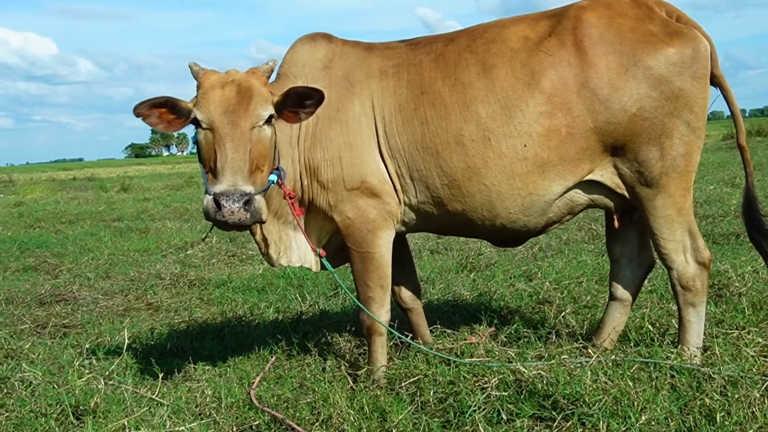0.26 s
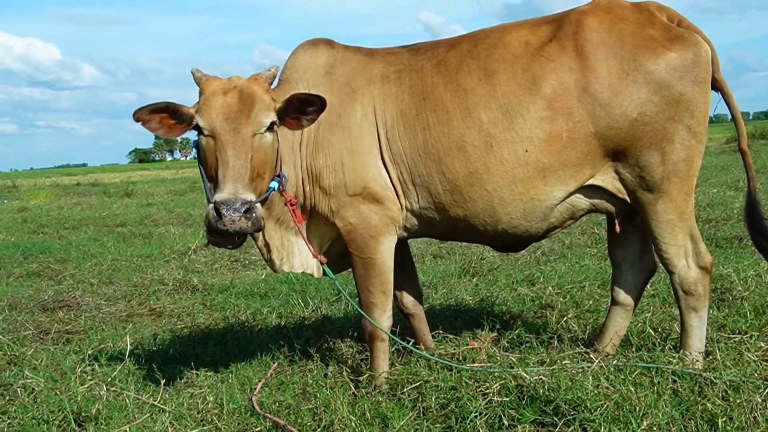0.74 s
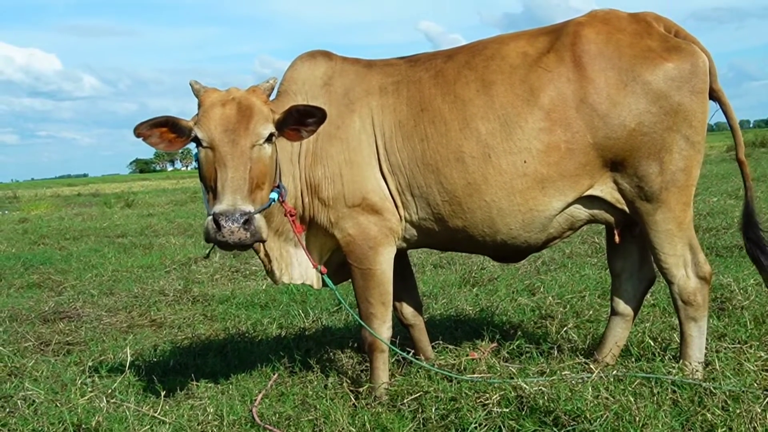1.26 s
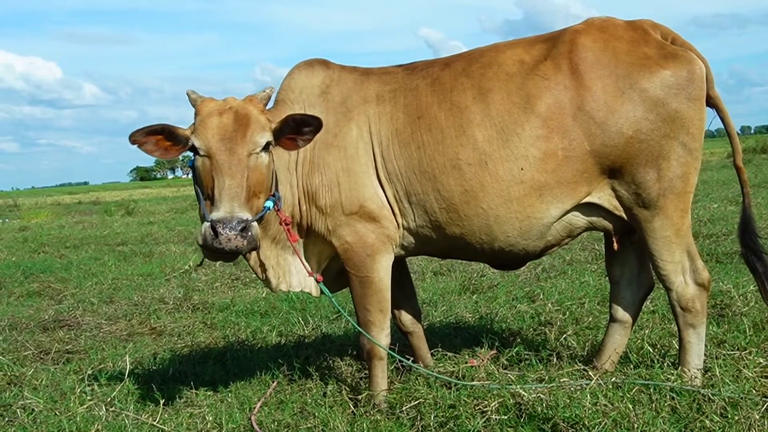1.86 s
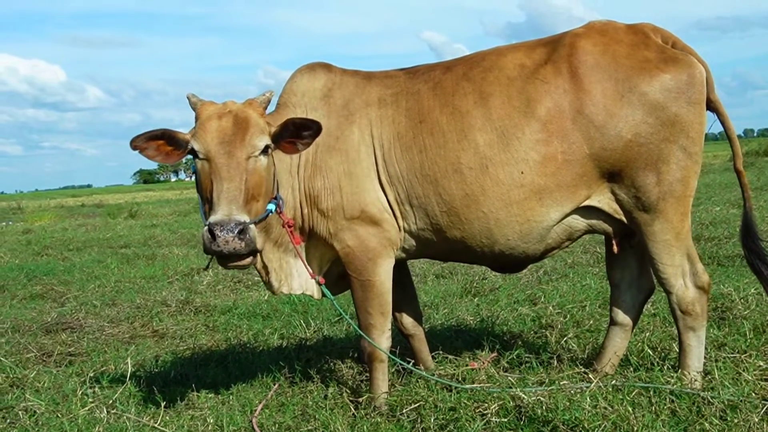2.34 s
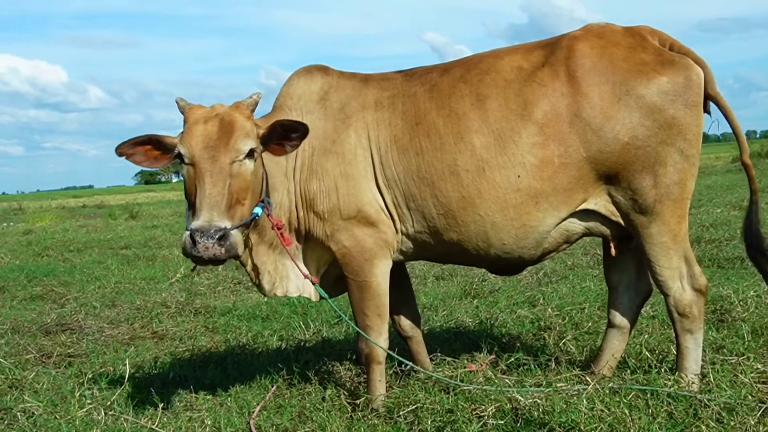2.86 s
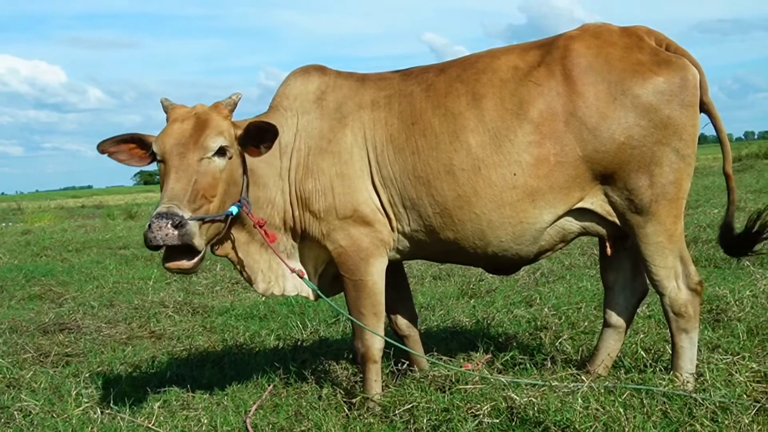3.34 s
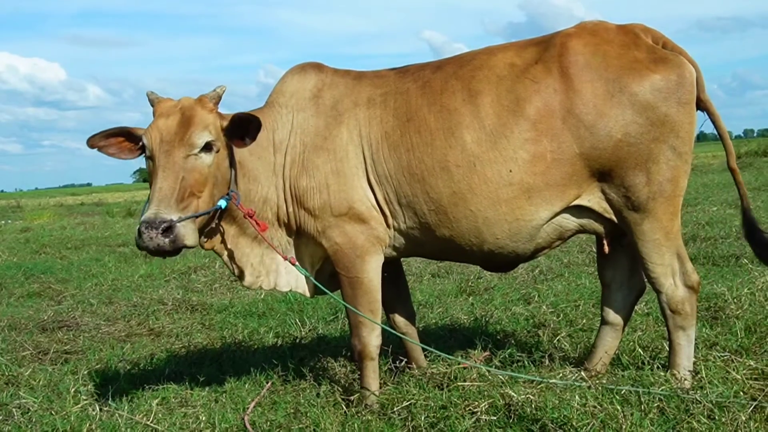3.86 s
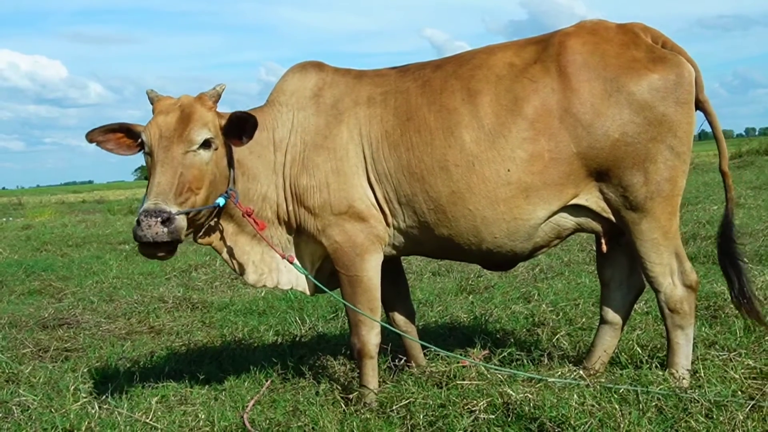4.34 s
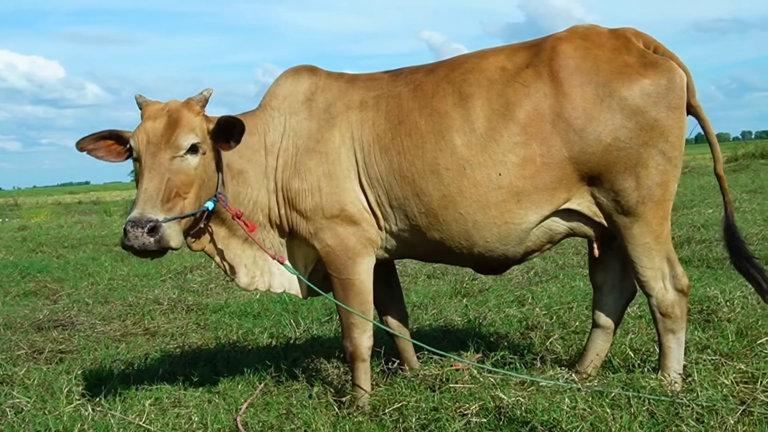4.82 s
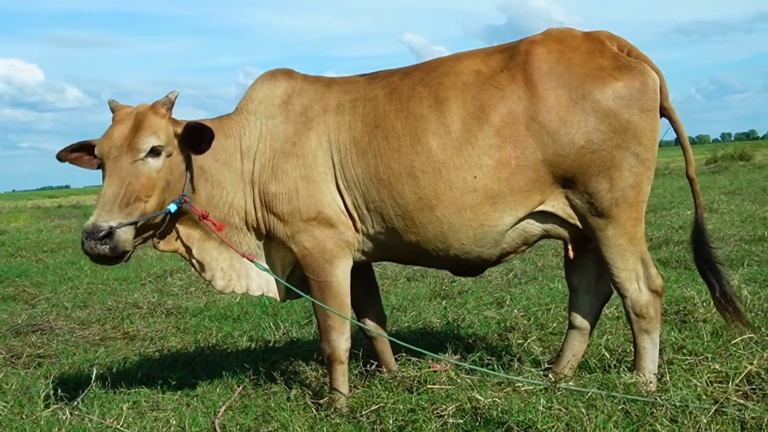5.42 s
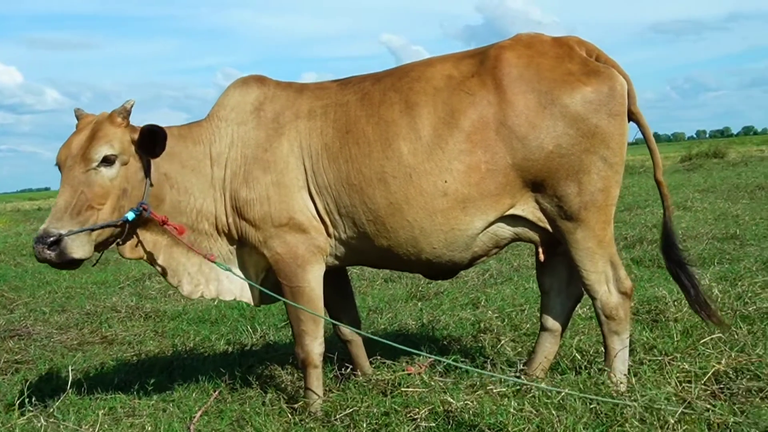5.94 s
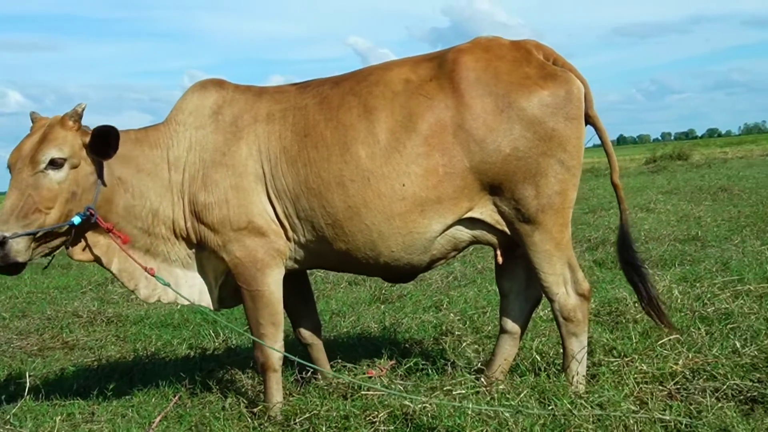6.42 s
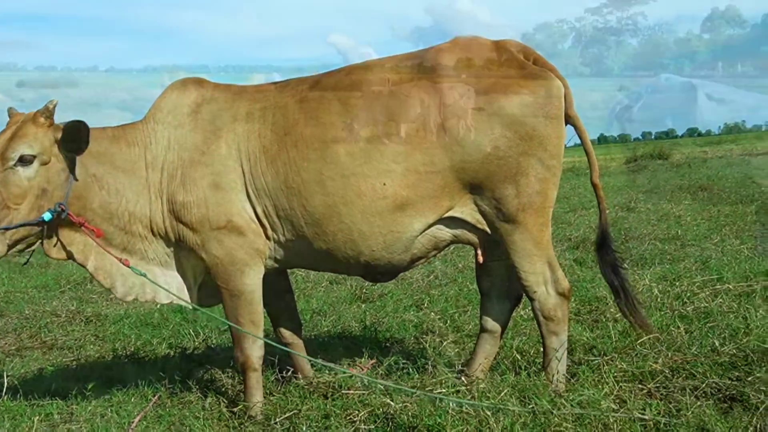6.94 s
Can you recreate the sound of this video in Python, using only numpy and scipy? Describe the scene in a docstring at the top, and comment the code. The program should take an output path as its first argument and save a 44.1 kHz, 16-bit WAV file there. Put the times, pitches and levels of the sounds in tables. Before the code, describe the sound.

A calm open pasture, heard in stereo for about seven seconds: steady low rumble, faint air and soft rustling grass, slightly stronger near 2.1 and 4.5 s. Small birds nearby, mostly left, warble in quick bending whistles around 0.5, 1.4, 1.8, 2.6 and 4.1 s, with a longer falling note at 4.4. Rapid trills recur, clearest at 2.3, over faint distant chirps. Soft blurred far calls hold near 3.7, 4.5 and 5.1. Dry grass snaps tick at 0.2, 1.0, 1.7, 2.8, 3.2, 4.1 and 5.0, the sharpest at 5.9. At 5.4 a close cow gives one low closed-mouth moo, unsteady at first, full until about 5.9, then sinking into a rough creak and gone by 6.2; an airy puff peaks at 5.5. Dense warbling accompanies the moo, returns around 6.3 to 6.7, and ends with bright chirps near 7.1.

```python
"""In an open field, a cow close by gives one short low moo with a puff of breath.
Small birds warble and trill as gliding tones, and far calls are held tones blurred with noise.
Grass snaps as short bursts of ringing and rustles as patchy noise, over air noise and a low rumble.
The moo is a train of vocal pulses, mixed with breath noise, that rings the throat."""
import sys
import numpy as np
from scipy import signal
from scipy.io import wavfile
from scipy.ndimage import uniform_filter1d

SR = 44100
rng = np.random.default_rng(int(sys.argv[2]) if len(sys.argv) > 2 else 0)


def store_pcm(level_fs):
    """Save levels as 16-bit WAV."""
    pcm = np.round(np.clip(level_fs, -1, 1) * 32767).astype(np.int16)
    wavfile.write(sys.argv[1], SR, np.atleast_2d(pcm).T)


N = 316621  # length of the scene [samples]


def gain_of(db):
    """Turns decibels into a plain multiplier."""
    return 10 ** (np.asarray(db) / 20)


def evened(x):
    """Scales a sound to an average strength (rms) of 1."""
    return x / np.sqrt(np.mean(x ** 2) + 1e-20)


def read(points, hz):
    """Reads a value at each pitch, along a logarithmic pitch axis."""
    point_hz, value = np.transpose(points)
    return np.interp(np.log(hz + 1), np.log(point_hz + 1), value)


def level(rows):
    """Joins (time [s], level [dB]) points into a gain curve over the whole scene."""
    s, db = np.transpose(rows)
    return gain_of(np.interp(np.arange(N) / SR, s, db))


def add(mix, s, sound, pan_db=0):
    """Lays a sound into both channels at time s; a positive pan_db leans to the left."""
    part = mix[:, round(max(s, 0) * SR):][:, :sound.shape[-1]]
    part += gain_of([[pan_db / 2], [-pan_db / 2]]) * sound[..., :part.shape[1]]


def wander(count, size):
    """A smooth random curve of rms 1; a larger size [samples] makes it slower."""
    once = uniform_filter1d(rng.standard_normal(count), size)
    return evened(uniform_filter1d(once, size))


def resonate(x, hz, width):
    """A resonance of gain 1 at its pitch: shifts that pitch to zero, smooths, and shifts back."""
    turn = np.exp(2j * np.pi * np.cumsum(hz * np.ones(len(x))) / SR)
    r = np.exp(-np.pi * width / SR)
    smooth = signal.lfilter([1 - r], [1, -r], x / turn + 1e-18)
    return 2 * (turn * smooth).real


def resonate_thrice(x, hz, width):
    """Three equal resonances in a row, which fall away more steeply on both sides."""
    for _ in range(3):
        x = resonate(x, hz, width)
    return x


def echoes(x, t60=0.27):
    """Scattered returns from ground and trees: sparse copies of random sign, down 60 dB after t60 [s]."""
    half = SR // 2
    taps = np.zeros((2, half))
    at = np.arange(300, half - 20, 20) + rng.integers(0, 20, (2, (half - 301) // 20))
    np.put_along_axis(taps, at, rng.choice([-1., 1.], at.shape), 1)
    taps *= gain_of(-60 * np.arange(half) / SR / t60)
    return signal.fftconvolve(x, taps / np.linalg.norm(taps[0]), axes=1)[:, :N]


# how alike the noise is on the left and right: (pitch [Hz], likeness [0-1])
LIKENESS = [(60, 1), (240, 0.97), (940, 0.65), (3750, 0.42), (14900, 0.2)]


def noise(spectrum, patchy_db, size=1024, count=10):
    """Coloured stereo noise of rms 1 with drifting louder and softer patches, smoothed over count bins."""
    frames, hz = 4 * N // size + 5, np.fft.rfftfreq(size, 1 / SR)
    a, b, c, d, patches = rng.standard_normal((frames, len(hz), 5)).T
    patches = evened(uniform_filter1d(uniform_filter1d(patches, count, 0), 12, 1))
    same = np.clip(read(LIKENESS, hz), -1, 1)[:, None]
    left = a + 1j * b
    right = same * left + np.sqrt(1 - same ** 2) * (c + 1j * d)
    z = np.array([left, right])
    z *= gain_of(read(spectrum, hz)[:, None] + patchy_db * patches)
    return evened(signal.istft(z, nperseg=size, noverlap=3 * size // 4)[1][:, :N])


# colour of the low rumble: (pitch [Hz], relative level [dB per Hz])
RUMBLE_COLOUR = [(25, -54.5), (34, -26), (43, -8), (70, -6.5), (100, -2), (141, -0.5), (201, -7), (252, -9),
                 (440, -26.5), (700, -51.5)]


def rumble():
    """Low noise, strongest around 140 Hz, that stays nearly even."""
    return gain_of(-39) * noise(RUMBLE_COLOUR, patchy_db=0.5, size=4096)


# colour of the air: (pitch [Hz], relative level [dB per Hz])
AIR_COLOUR = [(290, -6), (500, -0.5), (620, -0.5), (1440, 7), (2030, -1), (3410, -22), (7070, -24),
              (14100, -22.5), (15300, -40)]


def air():
    """Soft noise in wide, slowly drifting patches of pitch."""
    return gain_of(-54) * noise(AIR_COLOUR, patchy_db=2.5, count=90)


# loudness of the rustling grass: (time [s], level [dB])
RUSTLE_LEVEL = [(0.0, -47), (1.4, -48.5), (1.97, -45.5), (2.12, -41.5), (2.28, -46.5), (2.62, -48.5),
                (2.88, -47), (4.44, -45), (4.53, -38.5), (4.64, -46.5), (6.0, -48.5), (6.7, -49),
                (7.18, -48)]


def rustle():
    """Grass rustle: patchy noise, strongest around 3 kHz, that swells now and then."""
    colour = [(600, -7.0), (900, -5.5), (1600, -1.0), (3200, 3.5), (5000, -6.5), (8000, -15.5), (14000, -28.0)]
    return level(RUSTLE_LEVEL) * noise(colour, patchy_db=3, size=512, count=18)


def chatter(db=-58, count=340):
    """Faint steep chirps of birds further off: most join in around the near notes, the rest come at any time."""
    mix = np.zeros((2, N))
    for at, joins, lag, pitch, slide, size, side in rng.random((count, 7)):
        s = at * N / SR
        if joins < .8:
            s = NEAR_NOTES[int(at * len(NEAR_NOTES))][0] + .1 * (lag - .3)
        first_hz = 2500 + 2400 * pitch ** 2
        last_hz = first_hz * (1.35 - 0.8 * slide)
        middle_hz = (first_hz + last_hz) / 2
        chirp = whistle(.007 + 0.011 * size, first_hz, middle_hz, last_hz, db + 8 * size)
        add(mix, s, chirp, pan_db=16 * (side - .4))
    return mix


def far_call(rows):
    """A held tone blurred by the long path through moving air: a sine mixed with narrow noise."""
    s, hz, db = np.transpose(rows)
    t = np.arange(s[0], s[-1], 1 / SR)
    hz = np.interp(t, s, hz) * (1 + .008 * wander(len(t), size=2000))
    blur = evened(resonate(resonate(rng.standard_normal(len(t)), hz, 40), hz, 40))
    tone = np.sqrt(2) * np.sin(2 * np.pi * np.cumsum(hz) / SR)
    fade = signal.windows.tukey(len(t), .1)
    return s[0], gain_of(np.interp(t, s, db)) * evened(tone + 1.06 * blur) * fade


def short_far(s, length, top_hz, db):
    """Pitch and level points of a short far call, which climbs fast to its top and then sinks."""
    low_hz = top_hz * (1 - 0.0162)
    return [(s, low_hz, db - 3), (s + 0.31 * length, top_hz, db), (s + length, low_hz, db - 11)]


# short far calls: (time [s], length [s], top pitch [Hz], level at the top [dB])
SHORT_FAR_CALLS = [(2.213, 0.17, 1442, -50), (3.637, 0.314, 1610, -42.5), (3.65, 0.3, 1083, -43.5),
                   (4.934, 0.2, 1690, -54), (5.129, 0.314, 1663, -47), (5.134, 0.31, 1096, -51.5)]
# one far call that comes and goes: (time [s], pitch [Hz], level [dB])
LONG_FAR_CALL = [(2.52, 1556, -58), (3.9, 1563, -55), (3.96, 1545, -49), (4.25, 1512, -47.5),
                 (4.3, 1514, -63), (4.35, 1515, -47.5), (4.49, 1488, -38.5), (4.55, 1505, -52),
                 (4.74, 1480, -46)]


def far_calls():
    """All far calls, each a blurred tone that follows its own pitch and level points."""
    mix = np.zeros((2, N))
    for rows in [LONG_FAR_CALL] + [short_far(*row) for row in SHORT_FAR_CALLS]:
        add(mix, *far_call(rows))
    return mix


def snap(db, low_hz, high_hz, crisp_db):
    """A few fibre breaks within milliseconds ring two brief resonances and a crisp top."""
    t = np.arange(1500) / SR
    breaks = rng.standard_normal(len(t)) * (rng.random(len(t)) < .02) * np.exp(-t / 0.0078)
    breaks[0] = 1.0
    low = evened(resonate_thrice(breaks, low_hz, 500))
    high = evened(resonate_thrice(breaks, high_hz, 800))
    crisp = evened(resonate_thrice(breaks, 3500, 2400))
    ring = 0.71 * low + high + gain_of(crisp_db) * crisp
    return gain_of(db) * ring / abs(ring).max()


# grass snaps: (time [s], peak level before panning [dB], low ring [Hz], high ring [Hz], crisp top [dB])
GRASS_SNAPS = [(0.161, -24.5, 1230, 1600, -3), (1.014, -32, 1110, 1620, -5), (1.694, -31, 1140, 1440, -24),
               (1.716, -31.5, 1420, 1470, -20), (2.776, -28.5, 980, 1500, -22),
               (3.236, -26.5, 905, 3150, -5), (3.241, -22.5, 865, 2460, -2), (4.109, -29, 970, 1590, -8),
               (5.04, -29.5, 840, 1790, -1), (5.866, -17, 900, 2050, -4.5), (6.272, -28.5, 870, 2560, -2),
               (6.838, -29, 1290, 2600, 9)]


def grass_snaps():
    """Snapping grass: separate bursts of breaking fibres, a little to the left."""
    mix = np.zeros((2, N))
    for s, *settings in GRASS_SNAPS:
        add(mix, s, snap(*settings), pan_db=1.5)
    return mix


def trill(length, db, hz, uneven, per_s=121):
    """A quick train of chips; each swells and dies while its pitch drops."""
    n = round(length * SR)
    rate = per_s * (1 + (.12 + 0.21 * uneven) * wander(n, size=200))
    chip = (np.cumsum(rate) / SR) % 1  # 0 to 1 through each chip
    swell = np.sin(np.pi * chip) ** (2.2 - 2.5 * uneven)
    swell *= gain_of((3.5 - 3 * uneven) * wander(n, size=150))
    drop = (.22 - .1 * uneven) * (.5 - chip)
    drift = uneven * (.07 * np.linspace(-1, 1, n) + .05 * wander(n, size=60))
    tone = np.sin(2 * np.pi * np.cumsum(hz * (1 + drop + drift)) / SR)
    return gain_of(db) * evened(swell * tone) * signal.windows.tukey(n, .25)


# trains of falling chips:
# (time [s], length [s], level [dB], left over right [dB], pitch [Hz], unevenness [0-1])
TRILL_TRAINS = [(0.747, 0.16, -55, 0, 5330, 0.2), (1.404, 0.22, -55, -2, 5230, 0.2),
                (2.261, 0.21, -53.5, 1, 5210, 0.25), (2.272, 0.31, -40.5, 0.5, 2993, 0.58),
                (3.098, 0.32, -55, 0, 5120, 0.24), (3.968, 0.33, -54.5, 1, 5270, 0.1),
                (5.029, 0.29, -53.5, 0, 5250, 0.2), (6.058, 0.34, -56, -3, 5210, 0.33),
                (3.974, 0.26, -62, 11, 6800, 0.53), (4.115, 0.045, -42.5, 4, 3900, 0.43)]


def trills():
    """Trilling birds: every train of chips in its place."""
    mix = np.zeros((2, N))
    for s, length, db, pan_db, hz, uneven in TRILL_TRAINS:
        add(mix, s, trill(length, db, hz, uneven), pan_db)
    return mix


def whistle(length, first_hz, middle_hz, last_hz, db):
    """A near-sine that bends along a parabola and swells in the middle, with a slight flutter."""
    u = np.linspace(-1, 1, round(length * SR))
    bend = middle_hz + (last_hz - first_hz) * u / 2 + ((first_hz + last_hz) / 2 - middle_hz) * u ** 2
    glide = bend * (1 + .009 * wander(len(u), size=90))
    # the ends lie 5.5 dB under the middle; the power rounds the swell
    swell = gain_of(db - 5.5 * abs(u) ** 1.87 + 1.44 * wander(len(u), size=100))
    swell *= signal.windows.tukey(len(u), min(0.0012 / length, 1))
    swell *= evened(1 + 4.7 * length * wander(len(u), size=110))  # longer notes are raspier
    phase = 2 * np.pi * np.cumsum(glide) / SR
    return np.sqrt(2) * swell * (np.sin(phase) + gain_of(-29) * np.sin(2 * phase))


# whistled notes, each one smooth bend: (time [s], length [s], first pitch [Hz], middle pitch [Hz],
# last pitch [Hz], level in the middle [dB], left over right [dB])
NEAR_NOTES = [(0.514, 0.035, 3140, 3460, 3150, -43, 12), (0.543, 0.042, 3180, 3264, 2990, -36.5, 8),
              (0.582, 0.014, 3020, 3334, 3800, -35, 8), (0.594, 0.023, 3660, 3064, 2340, -38, 7),
              (.65, 0.047, 5320, 5470, 5740, -56, 4), (1.106, 0.013, 5950, 5100, 4400, -49, 3),
              (1.329, 0.043, 3700, 3600, 3400, -49, 3.5), (1.363, 0.029, 3440, 3344, 3420, -34, 4),
              (1.384, 0.12, 3300, 2915, 2740, -39.5, 3.5), (1.73, 0.037, 3570, 3270, 3230, -43.5, 10),
              (1.749, 0.018, 3280, 3450, 2380, -40, 11), (1.793, 0.004, 2500, 2860, 3300, -37, 17),
              (1.807, 0.022, 2820, 3500, 3280, -35.5, 9.5), (1.83, 0.024, 3390, 3356, 3310, -30, 7),
              (1.846, 0.014, 3410, 2850, 2320, -34.5, 11), (1.857, 0.027, 5070, 3950, 5000, -50, 6),
              (1.881, 0.01, 2320, 2550, 2300, -35, 12), (1.893, 0.029, 4640, 3660, 2620, -38, 5),
              (2.243, 0.036, 3780, 3380, 2900, -44, 7), (2.563, 0.039, 2970, 3450, 2970, -39, 9),
              (2.612, 0.057, 2990, 3216, 3160, -28.5, 9), (2.657, 0.018, 3200, 2550, 3650, -32.5, 10),
              (2.676, 0.01, 3650, 3950, 3700, -36, 5), (2.674, 0.038, 3080, 3500, 2850, -27, 8),
              (2.689, .046, 3730, 4460, 3900, -44, 5), (2.716, 0.025, 3030, 3340, 2320, -30, 7),
              (2.74, 0.024, 5190, 3690, 2620, -46, 6), (2.738, 0.03, 3820, 3550, 3440, -38, 2),
              (3.004, 0.079, 3150, 3120, 3060, -54.5, 9), (3.082, 0.024, 4920, 5210, 5000, -48.5, -12),
              (3.113, 0.011, 4850, 5130, 4770, -42, 2), (3.558, 0.12, 3150, 3210, 3170, -49.5, 7),
              (3.698, 0.039, 2990, 4070, 3220, -47.5, 5), (3.695, 0.076, 2890, 3190, 3040, -43, 5),
              (3.795, 0.017, 2080, 2440, 2830, -39.5, -9), (3.968, 0.062, 3750, 3360, 3230, -42.5, 8),
              (3.992, 0.02, 3180, 2510, 2200, -42, -3), (4.019, 0.024, 2800, 2910, 3000, -40, -4),
              (4.069, 0.041, 3170, 3430, 3120, -36.5, 10), (4.198, 0.015, 3350, 2980, 2480, -32, 10),
              (4.148, 0.017, 2490, 2975, 3350, -33.5, 11), (4.158, 0.06, 3277, 3334, 3070, -31, 8),
              (4.216, 0.017, 4500, 3450, 4700, -34.5, 4), (4.243, 0.024, 4980, 3700, 2720, -39, 5),
              (4.411, 0.17, 3605, 2897, 2180, -35, 3.5), (5.103, 0.15, 2840, 2715, 1900, -54.5, 23),
              (5.21, 0.055, 5550, 4050, 3200, -42.5, -6), (5.292, 0.041, 3525, 3610, 3050, -44.5, 11),
              (5.339, 0.026, 3500, 3290, 2980, -38, 10), (5.463, 0.022, 3100, 3100, 3250, -36.5, 12.5),
              (5.477, 0.015, 3200, 4160, 3000, -31.5, 6), (5.489, 0.011, 2990, 3810, 3080, -29.5, 7.5),
              (5.52, 0.0097, 2400, 3550, 4250, -30, 9.5), (5.527, 0.009, 4250, 3710, 4400, -30, 7),
              (5.537, 0.016, 4450, 4770, 4600, -47.5, 8), (5.555, 0.008, 4500, 3640, 2950, -32, 6),
              (5.559, .021, 2890, 3054, 2520, -31.5, 10), (5.558, 0.046, 3550, 4640, 3550, -42.5, 1),
              (5.592, 0.016, 2520, 2844, 2950, -37, 13), (5.604, 0.023, 3150, 3690, 2520, -30.5, 6),
              (5.631, .021, 2810, 3720, 2450, -30.5, 5.5), (5.65, 0.011, 5360, 4760, 5030, -46, 9),
              (5.664, 0.027, 5110, 3920, 2550, -39, 5.5), (5.817, 0.048, 2990, 4060, 3120, -47.5, 12),
              (5.944, 0.12, 5840, 5880, 5080, -42.5, 9), (6.305, 0.042, 3080, 3510, 4270, -40.5, 8),
              (6.344, 0.028, 3900, 3530, 3400, -40, 9), (6.375, 0.038, 3390, 3600, 3620, -41.5, 7),
              (6.415, 0.034, 2930, 2780, 2680, -46, 16), (6.446, 0.023, 3180, 3260, 2500, -33, 11),
              (6.472, 0.012, 4050, 2950, 3900, -39, 12), (6.487, 0.033, 2690, 3485, 3100, -32.5, 6),
              (6.505, 0.02, 3320, 3040, 2500, -37.5, 16), (6.534, 0.017, 2460, 3620, 2290, -33, 10.5),
              (6.562, 0.02, 4970, 5850, 5100, -43.5, 9), (6.578, 0.025, 5800, 4600, 3500, -40, 8),
              (6.579, 0.03, 3990, 3730, 2880, -41.5, 13), (6.614, 0.051, 3720, 3380, 3240, -46, 10),
              (6.593, 0.17, 2400, 2326, 2296, -45, -2), (6.722, 0.016, 5500, 5030, 4140, -44, -1),
              (6.745, 0.021, 4080, 5200, 3640, -46.5, -5), (7.062, 0.013, 3950, 3860, 3550, -43, 7),
              (7.072, 0.025, 5600, 5060, 3150, -40.5, 6), (7.106, 0.023, 3150, 3460, 3480, -46, 5),
              (7.12, 0.015, 2600, 3520, 5470, -41.5, 7), (7.164, 0.025, 5360, 4940, 4330, -32.5, 3.5)]


def warble():
    """Warbling birds nearby: short whistles, each with its own bend."""
    mix = np.zeros((2, N))
    for s, *note, pan_db in NEAR_NOTES:
        add(mix, s, whistle(*note), pan_db)
    return mix


# loudness of the breath: (time [s], level [dB])
BREATH_LEVEL = [(4.9, -90), (5.1, -57), (5.3, -52.5), (5.43, -48.5), (5.52, -42), (5.64, -49),
                (5.72, -55.5), (6.3, -54), (6.6, -56.5)]
# colour of the breath: (pitch [Hz], relative level [dB per Hz])
BREATH_TINT = [(3000, -12), (5500, -6), (11400, -20), (13600, -18.5), (15300, -27)]


def breath():
    """The cow's puff of breath: airy noise that rises and falls."""
    return level(BREATH_LEVEL) * noise(BREATH_TINT, patchy_db=2.5, size=512)


# the cow's voice: (time [s], effort [dB], pulse rate [Hz], brightness of the rings above 400 Hz [dB])
MOO_VOICE = [(5.398, -74, 96.5, -9), (5.416, -25, 97.3, -4), (5.45, -33.5, 98.9, 16.5),
             (5.495, -21.5, 98.7, 3.5), (5.518, -28.5, 94.16, 8), (5.548, -17.5, 92.78, -1.5),
             (5.699, -17.5, 92.84, 6.5), (5.795, -15, 91.5, 2.5), (5.82, -20, 87.77, 7.5),
             (5.847, -16.5, 87.37, 1), (5.89, -25, 77.1, 9), (5.94, -19, 67.52, 4), (6.024, -29, 61.1, 6.5),
             (6.14, -27.5, 61.3, 3), (6.17, -40, 62.8, 11), (6.221, -41, 61, 14)]
# rings of the throat: (pitch at the unsteady start [Hz], settled pitch [Hz], width [Hz],
# relative level [dB], left over right [dB], change as the throat closes [dB per s])
THROAT_RINGS = [(283, 272.6, 122, 2, 0.5, -2), (457, 505, 180, -16.5, -3, -87),
                (944, 874, 156, -22.5, -4, -20), (1070, 1154, 210, -29, -4.5, 8),
                (2050, 2050, 700, -41, -4, 0), (139.5, 130, 132, -19, -2.5, 0),
                (700, 690, 850, -37, -4, -20)]
STEADY_HZ = 90  # the folds run fairly clean down to this pulse rate and rougher below it
SETTLE_S, CLOSE_S = 5.55, 6.0  # the voice has settled; the throat starts to close [s]
HOARSE_S = 5.72  # from here the upper rings fill with more breath noise [s]


def moo():
    """Slow vocal pulses, unsteady at first and creaking as the pitch sinks, ring a long closed-mouth throat."""
    s, *columns = np.transpose(MOO_VOICE)
    t = np.arange(s[0], s[-1], 1 / SR)
    effort_db, hz, bright_db = (np.interp(t, s, c) for c in columns)
    unsettled = np.maximum(SETTLE_S - t, 0) / (SETTLE_S - s[0])
    rough = np.clip(.13 + .024 * np.maximum(STEADY_HZ - hz, 0) + .4 * unsettled, 0, .7)
    turns = np.cumsum(hz * (1 + 0.14 * rough * wander(len(t), size=250))) / SR
    # roughness makes the pulses differ in strength
    strength = gain_of(3 * rough * rng.standard_normal(200)[np.round(turns).astype(int)])
    folds = evened(strength * sum(np.cos(2 * np.pi * k * turns) for k in range(1, 32)))
    puffs = evened((0.3 + np.exp(-(turns % 1) / 0.42)) * rng.standard_normal(len(t)))
    more_breath = np.clip((t - HOARSE_S) / .03, 0, 1)
    settled = np.clip((t - s[0]) / (SETTLE_S - s[0]), 0, 1) ** 2
    throat = np.zeros((2, len(t)))
    for k, (start_hz, ring_hz, width, db, pan_db, close_db) in enumerate(THROAT_RINGS):
        upper = ring_hz > 400
        # breath noise shows more in the upper and wide rings
        hoarse = rough + upper * (.08 + .22 * more_breath) + .25 * (ring_hz > 1000) + .5 * (width > 600)
        hoarse = np.minimum(hoarse, 1)
        drive = (1 - hoarse) * folds + hoarse * 1.5 * puffs
        path = start_hz + (ring_hz - start_hz) * settled
        ring = resonate_thrice(drive, path, width)
        # each upper ring drifts slowly and randomly in level
        drift_db = 2 * upper * wander(len(t), size=900)
        ring *= gain_of(drift_db + close_db * np.maximum(t - CLOSE_S, 0))
        add(throat, 0, (-1) ** k * gain_of(db + bright_db * upper) * ring, pan_db)
    # effort sets the loudness whether or not a harmonic sits on the first resonance
    power = uniform_filter1d((throat ** 2).mean(0), size=1500)
    mix = np.zeros((2, N))
    add(mix, s[0], gain_of(effort_db) * throat / np.sqrt(power + 1e-9))
    return mix


def scene():
    """Noise beds, birds and grass with their echoes, then the breath and the cow."""
    beds = rumble() + air() + rustle()
    near = chatter() + far_calls() + grass_snaps() + trills() + warble()
    returns = gain_of(-5.5) * echoes(near)
    return beds + near + returns + breath() + moo()


def record(dry):
    """Cuts off the sound above about 15.4 kHz with a steep filter."""
    edge = signal.firwin(601, 15420, window=("kaiser", 9), fs=SR)
    return signal.oaconvolve(dry, edge[None], "same")


dry = scene()
out = record(dry)
store_pcm(out)
```